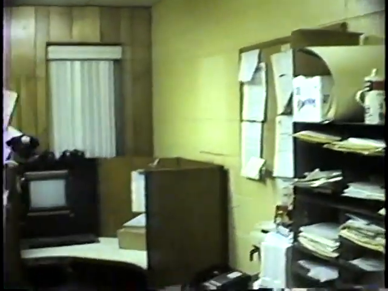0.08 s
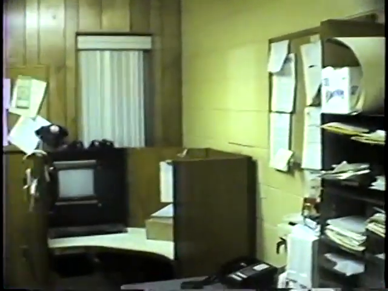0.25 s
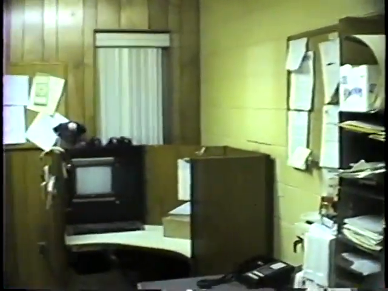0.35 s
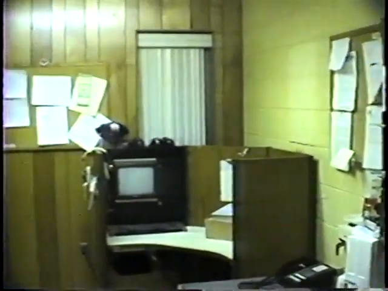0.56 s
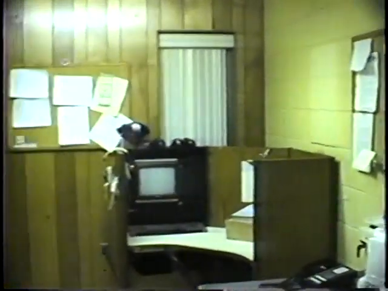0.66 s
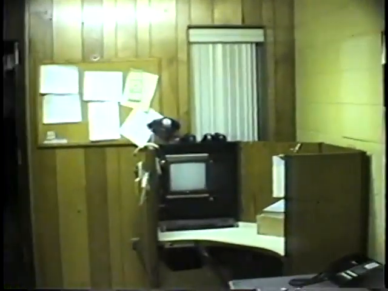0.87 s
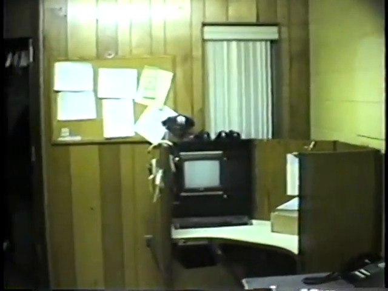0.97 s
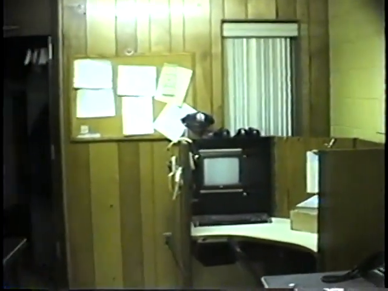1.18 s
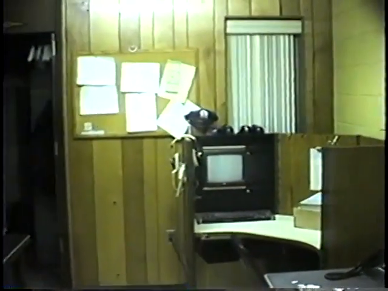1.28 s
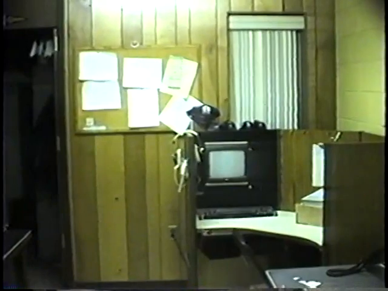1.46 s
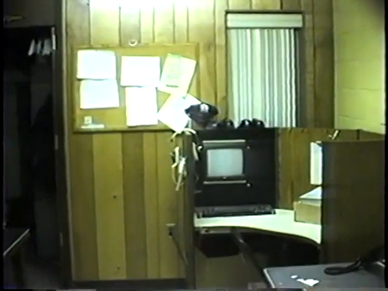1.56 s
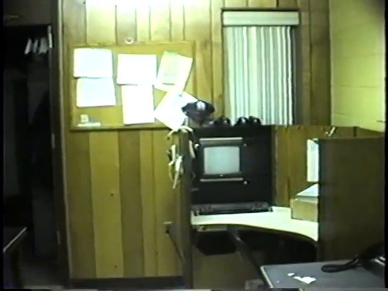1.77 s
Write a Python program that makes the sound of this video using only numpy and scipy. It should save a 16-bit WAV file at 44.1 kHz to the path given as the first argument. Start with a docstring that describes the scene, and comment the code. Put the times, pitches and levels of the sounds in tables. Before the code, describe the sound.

A hand-held tape camcorder hums and whines steadily over soft hiss and low rumble in a quiet office; a loud wooden knock with a click comes almost at once, then fainter bumps and ticks, close to the microphone.

```python
"""Steady hum and whine of a hand-held tape camcorder panning across a quiet office, over tape hiss and low rumble.
The head drum is one comb of phase-locked cosines; its twelfth multiple, the whine, follows a level table.
Hiss and rumble are coloured noise with flickering half-octaves. Now and then something knocks with a dull
wooden boom (damped modes under a short push) and the casing ticks (noise bursts ringing casing modes)."""
import sys
import numpy as np
from scipy import signal
from scipy.fft import rfft, irfft
from scipy.io import wavfile
from scipy.ndimage import uniform_filter1d

SR = 44100
rng = np.random.default_rng(int(sys.argv[2]) if len(sys.argv) > 2 else 0)


def boost(x):
    """Linear amplitude factor 10**(x/20) for a level x in decibels (scalar or array-like)."""
    u = np.asarray(x, float) / 20
    return 10 ** u


def dump(signal):
    """Clip the signal to [-1, 1] and save it as 16-bit WAV at the path in sys.argv[1]."""
    limited = np.clip(np.atleast_2d(signal).T, -1, 1)
    pcm = np.round(limited * 32767).astype(np.int16)
    wavfile.write(sys.argv[1], SR, pcm)


N = 79380
T = np.arange(N) / SR

# The *_SCALE_* settings multiply walk().
DRUM_HZ, WHINE_ORDER = 179.82, 12
# Drum comb, whine excluded: multiple of DRUM_HZ
DRUM_ORDERS = [1, 6, 7, 8, 9, 10, 11, 13, 14, 16, 17, 18, 20, 24, 25, 26, 28, 30, 31, 32, 33, 34, 36]
# Drum comb, one per multiple: level_db (rms, before waver)
DRUM_LEVELS_DB = [-57, -72, -71.5, -66.5, -64.5, -63, -66, -66, -73.5, -72.5, -83, -77, -85, -70.5, -122,
                  -77, -72, -104.5, -70.5, -92.5, -73, -72.5, -77]
# Whine level as the camera turns: time_s, level_db (rms, before waver)
WHINE_LEVEL = [(0, -48.5), (.1, -52), (.15, -57), (.2, -60), (.28, -59), (.33, -54), (.4, -51.5), (.5, -50),
               (.73, -48.5), (1.0, -51), (1.3, -53), (1.67, -56.5), (1.8, -54)]
PHASE_CURL_RAD = 2.5  # per squared step from the whine: smears the pulse over the cycle
DRUM_JITTER_SCALE_S, SWITCH_JITTER_SCALE_S = .00002, .00001
# Drive switching lines at 10 kHz, for every 8th, 4th, 2nd multiple: level_db (rms, before waver)
SWITCH_LEVELS_DB = [-78, -82, -87]
SWITCH_FALL_DB_PER_KHZ = .3
# Other steady tones: pitch_hz, level_db (rms, before waver)
STEADY_TONES = [(1124, -68), (1229, -64), (1299, -70), (2119, -68), (2458, -75), (4177, -79), (4387, -77),
                (6180, -77), (8393, -84), (9830, -86), (11267, -87), (12710, -89), (15734, -84)]
WAVER_SCALE_DB, WHINE_WAVER_SCALE_DB = 2.6, .6

# Rumble colour: freq_hz, density_db (relative, per Hz)
RUMBLE_COLOUR = [(11, -61), (18, -19), (91, -12.5), (114, -5.5), (151, -16.5), (167, -6), (184, -2),
                 (251, -1), (282, -6), (348, -30.5), (483, -26.5), (516, -27), (551, -27), (777, -42.5),
                 (900, -31), (1170, -23), (1980, -120)]
# Hiss colour: freq_hz, density_db (relative, per Hz)
HISS_COLOUR = [(410, -5), (700, -10), (841, -11.5), (1250, -10.5), (1520, -11.5), (1600, -9), (1890, -14),
               (2190, -7.5), (2300, -12.5), (2590, -14.5), (4610, -13), (5760, -13.5), (6830, -17.5),
               (15200, -27), (16000, -33)]
RUMBLE_RMS_DB, RUMBLE_FLICKER_SCALE_DB = -49, 5.1
HISS_RMS_DB, HISS_FLICKER_SCALE_DB = -53.5, 0.76  # rms before the pulsing
HISS_PULSE_DEPTH = 0.19

# Knocks, peaks before the bass cut: start_s, body_db, boom_db, ring_db, spot_hz (pitch the ring favours)
KNOCKS = [(.0, -50, -38, -65, 497), (0.114, -58, -39.5, -48.5, 500), (0.2155, -8.5, -20.5, -21, 790),
          (0.379, -36.5, -37.5, -63, 500), (.5, -34, -58, -55, 500), (0.7309, -64, -41, -38.5, 550),
          (0.741, -37.5, -35.5, -53, 500), (1.1022, -28, -31, -31, 540), (1.159, -36, -62, -63, 500),
          (1.56, -44.5, -41, -58, 500), (1.687, -38, -28.5, -47.5, 504), (1.751, -46, -38.5, -47.5, 505)]
# Low boom modes, sounding just after each blow: freq_hz, level_db (relative), t60_s
BOOM_MODES = [(97.2, -0.5, 0.17), (134.3, -23.5, 0.45)]
# Body modes of the struck thing: freq_hz, level_db (relative), t60_s
BODY_MODES = [(195.8, -6, 0.18), (225, -2, 0.15), (263, 0, 0.08), (299, -4.5, 0.11)]
# Upper ring modes, before the spot weighting: freq_hz, level_db (relative), t60_s
RING_MODES = [(460, 0, .12), (540, -3, .06), (600, -7, .05), (720, -12, .04), (960, -15, .035),
              (1230, -12, .03)]
BODY_PUSH_S, BOOM_PUSH_S, RING_PUSH_S = .0045, .009, .0017
BOOM_LATE_S, RING_LATE_S = .001, .002
RING_WIDTH_LN = .45  # natural log of frequency ratio
BASS_CUT_HZ = 102

# Ticks: start_s, level_db (rms over length_s, before the top cut), centre_hz, width_ln (log pitch), length_s
TICKS = [(.2152, -34, 4200, 1.2, .0028), (.3238, -41, 4500, 1.8, .0025), (.7190, -47, 3400, .4, .002),
         (.7325, -49, 3000, .25, .004), (1.1038, -44, 2200, 1., .002), (1.6848, -41, 6800, .4, .002),
         (1.717, -52, 9000, .3, .001)]
# Casing modes, before the tick weighting: freq_hz, level_db (relative), t60_s
CASING_MODES = [(700, -18, 0.0098), (1250, 11.5, 0.013), (1850, 5.5, .006), (2970, -0.5, 0.0056),
                (3990, 6.5, 0.0051), (4930, 2, 0.005), (5970, 9, 0.004), (6900, 2, 0.0065), (7740, 1, .006),
                (9400, -2, 0.0052), (10200, 1, 0.0039)]
TICK_TAIL_DB, TICK_TAIL_S = -20, .008  # tail start re burst, 1/e time
TICK_TOP_HZ = 11000


def walk(rate_hz):
    """Smooth random drift: normal draws held 1 / rate_hz s, slewed twice; spread about 0.7."""
    hold = int(SR / rate_hz)
    steps = np.repeat(rng.standard_normal(N // hold + 1), hold)
    return 0.95 * uniform_filter1d(uniform_filter1d(steps, hold), hold)[:N]


def tone(hz, db, phase, t=T):
    """Steady line whose level wavers."""
    level = np.sqrt(2) * boost(db + WAVER_SCALE_DB * walk(8.94))
    return level * np.cos(2 * np.pi * hz * t + phase)


def whine(t):
    """Twelfth drum multiple, swelling and fading along its level table."""
    time_s, level_db = np.transpose(WHINE_LEVEL)
    db = np.interp(T, time_s, level_db) + WHINE_WAVER_SCALE_DB * walk(30)
    return np.sqrt(2) * boost(db) * np.cos(2 * np.pi * WHINE_ORDER * DRUM_HZ * t)


def switching():
    """Drive switching: even drum multiples 38-86, random phases, one shared jitter."""
    t = T + SWITCH_JITTER_SCALE_S * walk(11.5)
    out = np.zeros(N)
    for k in range(38, 88, 2):
        rank = 0 if k % 8 == 0 else 1 if k % 4 == 0 else 2
        hz = k * DRUM_HZ
        db = SWITCH_LEVELS_DB[rank] - SWITCH_FALL_DB_PER_KHZ * (hz / 1000 - 10)
        out += tone(hz, db, rng.uniform(0, 2 * np.pi), t)
    return out


def drum():
    """Phase-locked drum multiples and whine on one jittered clock, plus switching and other tones."""
    t = T + DRUM_JITTER_SCALE_S * walk(14)
    out = whine(t) + switching()
    for k, db in zip(DRUM_ORDERS, DRUM_LEVELS_DB):
        out += tone(k * DRUM_HZ, db, PHASE_CURL_RAD * (k - WHINE_ORDER) ** 2, t)
    for hz, db in STEADY_TONES:
        out += tone(hz, db, rng.uniform(0, 2 * np.pi))
    return out


def coloured_noise(colour, rms_db, flicker_scale_db, rate_hz):
    """Gaussian noise shaped by a colour table; each half-octave flickers on its own."""
    hz = np.maximum(np.arange(N // 2 + 1) * SR / N, 1)
    knot_hz, knot_db = np.transpose(colour)
    spectrum = rfft(rng.standard_normal(N)) * boost(np.interp(np.log(hz), np.log(knot_hz), knot_db))
    half_octave = 2 * np.log2(hz)
    first, last = int(2 * np.log2(knot_hz[0])) - 1, int(2 * np.log2(knot_hz[-1])) + 1
    out = np.zeros(N)
    for k in range(first, last + 1):
        band = np.clip(1 - abs(half_octave - k), 0, 1)  # overlapping triangles
        out += irfft(spectrum * band, N) * boost(flicker_scale_db * walk(rate_hz))
    return out * boost(rms_db) / np.std(out)


def noise_floor():
    """Low rumble, plus hiss pulsing slightly at the drum rate."""
    rumble = coloured_noise(RUMBLE_COLOUR, RUMBLE_RMS_DB, RUMBLE_FLICKER_SCALE_DB, 15)
    hiss = coloured_noise(HISS_COLOUR, HISS_RMS_DB, HISS_FLICKER_SCALE_DB, 11.85)
    pulse = 1 + HISS_PULSE_DEPTH * np.cos(2 * np.pi * DRUM_HZ * T)
    return rumble + pulse * hiss


def struck(modes, push_s):
    """Damped modes driven by a push and rebound, peak 1."""
    t = T[:SR // 3]
    y = np.zeros(len(t))
    for hz, db, t60_s in modes:
        y += boost(db) * np.exp(-np.log(1000) * t / t60_s) * np.sin(2 * np.pi * hz * t)
    u = 2 * np.pi * np.arange(0, 1, 1 / (push_s * SR))
    push = np.sin(u) * np.sin(u / 2)
    y = np.convolve(y, push)[:len(t)]
    return -y / abs(y).max()


def add(out, x, start_s):
    """Mix x into out from start_s on."""
    i = max(int(start_s * SR), 0)
    out[i:i + len(x)] += x[:N - i]


def knocks():
    """Blows ring shared body and boom modes; the spot struck weights the upper ring; no deep bass."""
    out = np.zeros(N)
    body, boom = struck(BODY_MODES, BODY_PUSH_S), struck(BOOM_MODES, BOOM_PUSH_S)
    for start_s, body_db, boom_db, ring_db, spot_hz in KNOCKS:
        near = []
        for hz, db, t60_s in RING_MODES:
            distance = np.log(hz / spot_hz) / RING_WIDTH_LN
            near.append((hz, db - 20 / np.log(10) * distance ** 2, t60_s))  # Gaussian in amplitude
        add(out, boost(body_db) * body, start_s)
        add(out, boost(ring_db) * struck(near, RING_PUSH_S), start_s + RING_LATE_S)
        add(out, boost(boom_db) * boom, start_s + BOOM_LATE_S)
    return signal.sosfilt(signal.butter(2, BASS_CUT_HZ, "high", fs=SR, output="sos"), out)


def ticks():
    """Noise bursts of a few ms, with a faint tail, ring the casing modes nearest each tick's centre."""
    out, t = np.zeros(N), T[:SR // 20]
    for start_s, db, centre_hz, width_ln, length_s in TICKS:
        envelope = np.exp(-(t / length_s) ** 3) + boost(TICK_TAIL_DB) * np.exp(-t / TICK_TAIL_S)
        casing = np.zeros(len(t))
        for hz, mode_db, t60_s in CASING_MODES:
            nearness = np.exp(-(np.log(hz / centre_hz) / width_ln) ** 2)
            decay = np.exp(-np.log(1000) * t / t60_s)
            casing += boost(mode_db) * nearness * decay * np.sin(2 * np.pi * hz * t)
        crackle = envelope * rng.standard_normal(len(t))
        y = np.convolve(crackle, casing)[:len(t)]
        add(out, boost(db) * y / np.std(y[:int(length_s * SR)]), start_s)
    return signal.sosfilt(signal.butter(6, TICK_TOP_HZ, fs=SR, output="sos"), out)


def scene():
    """All sources sum at one microphone."""
    return (drum() + noise_floor() + knocks() + ticks())[None]


def top_cut(x):
    """Nothing passes above the cut-off."""
    return signal.sosfilt(signal.butter(12, 16130, fs=SR, output="sos"), x)


def record(dry):
    """Deliver the finished mix."""
    return top_cut(dry)


dry = scene()
out = record(dry)
dump(out)
```